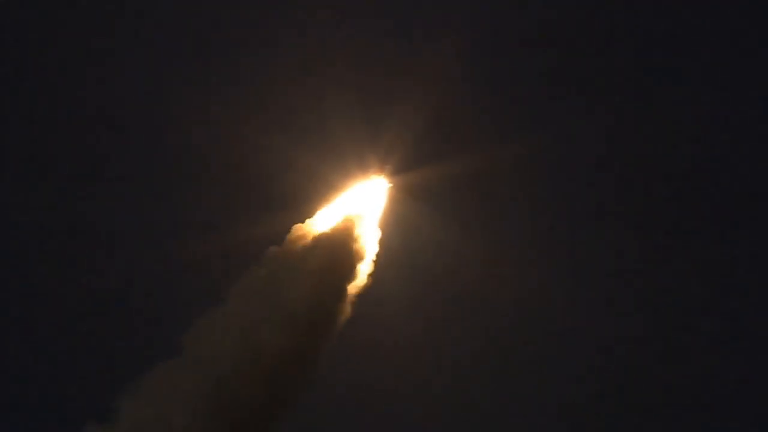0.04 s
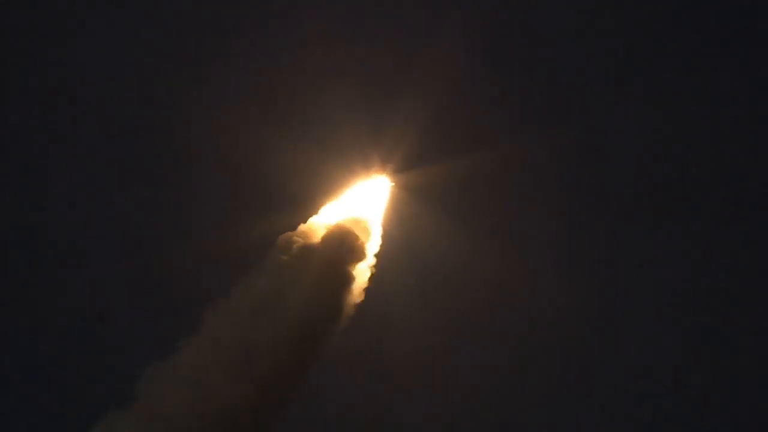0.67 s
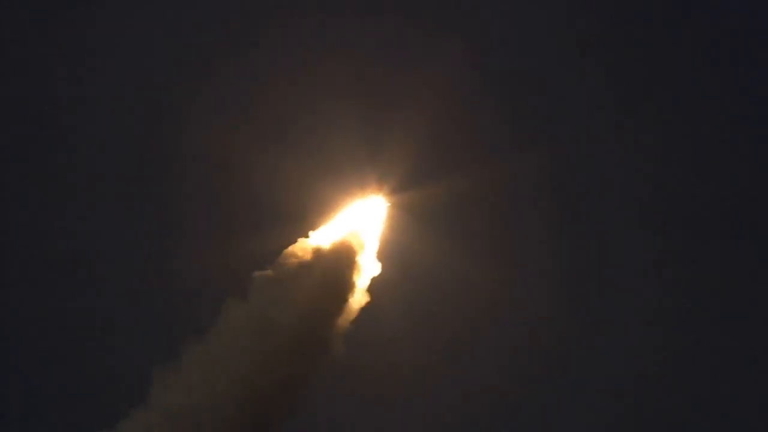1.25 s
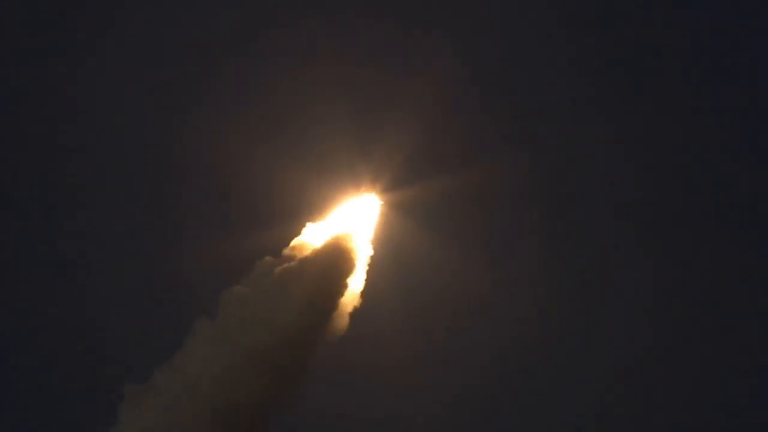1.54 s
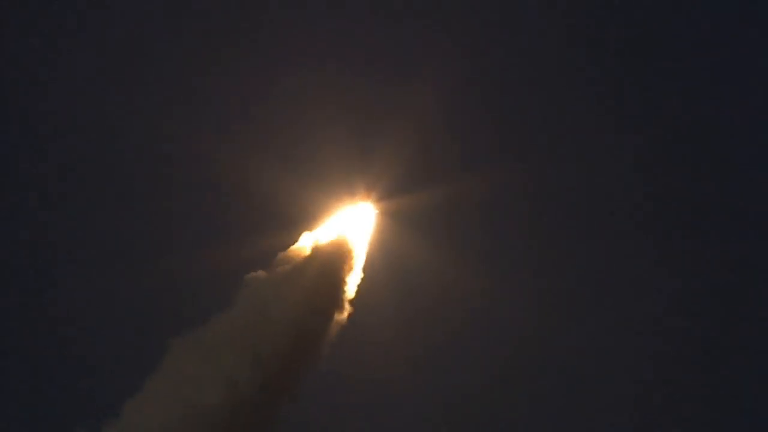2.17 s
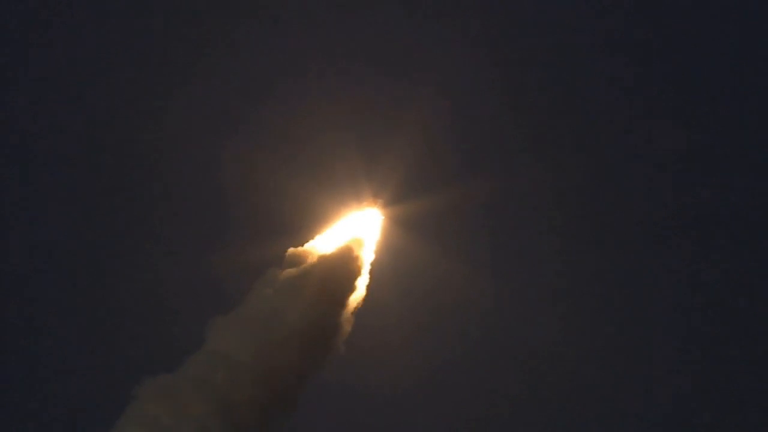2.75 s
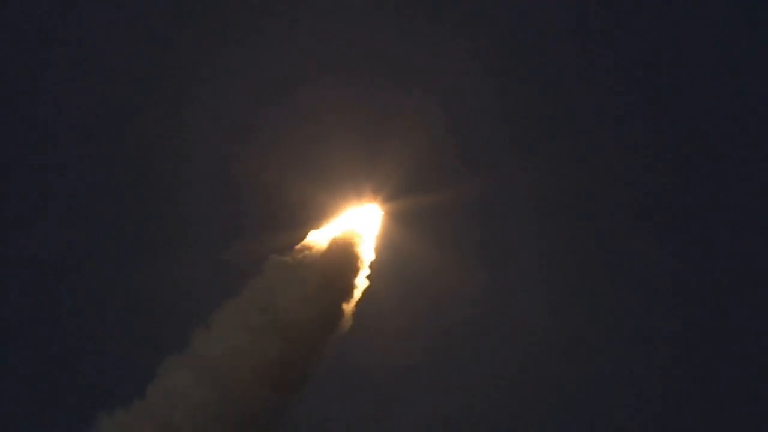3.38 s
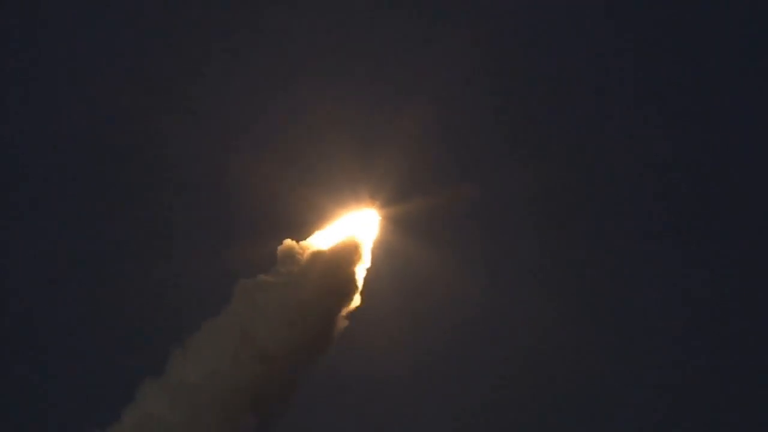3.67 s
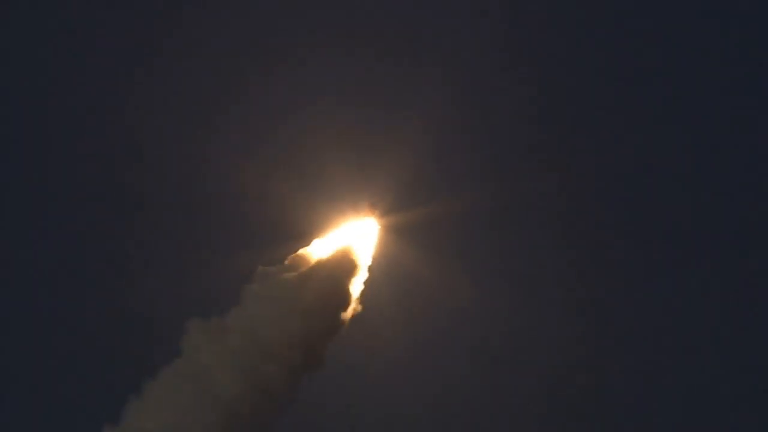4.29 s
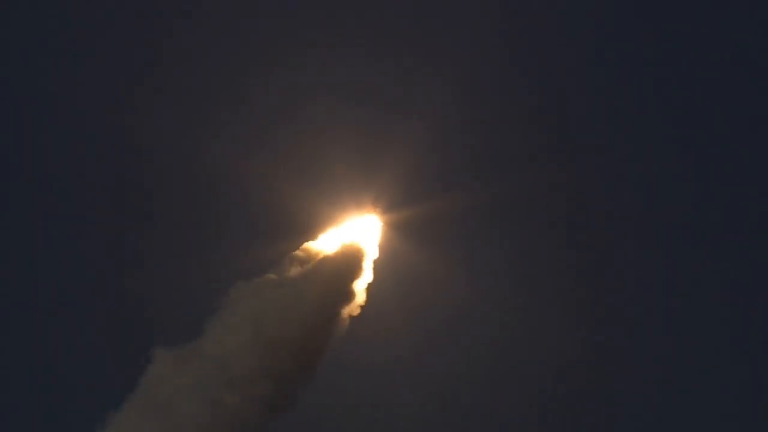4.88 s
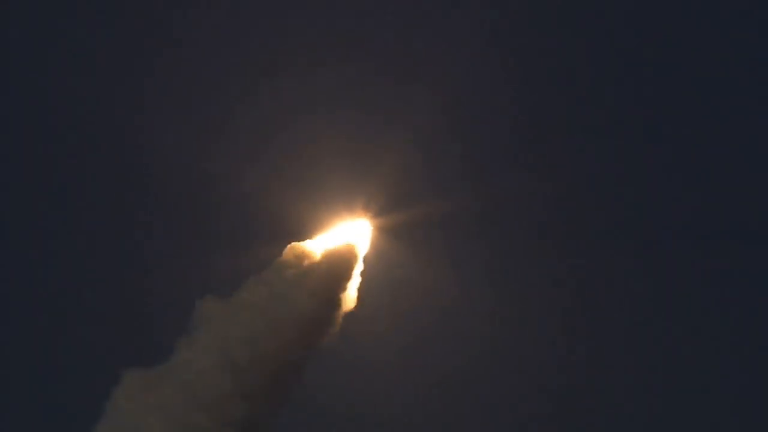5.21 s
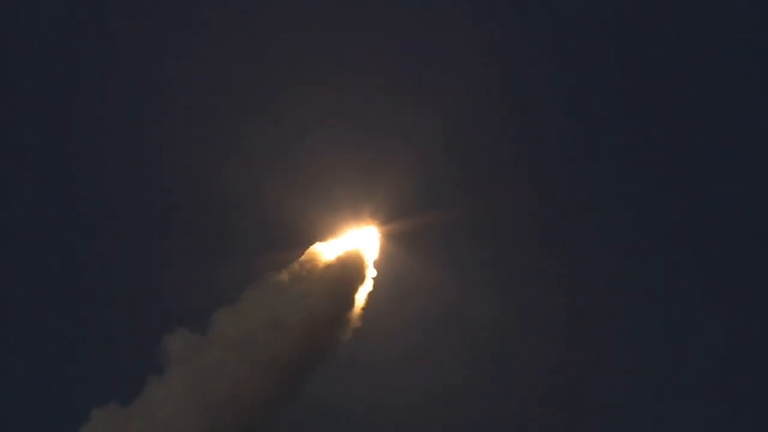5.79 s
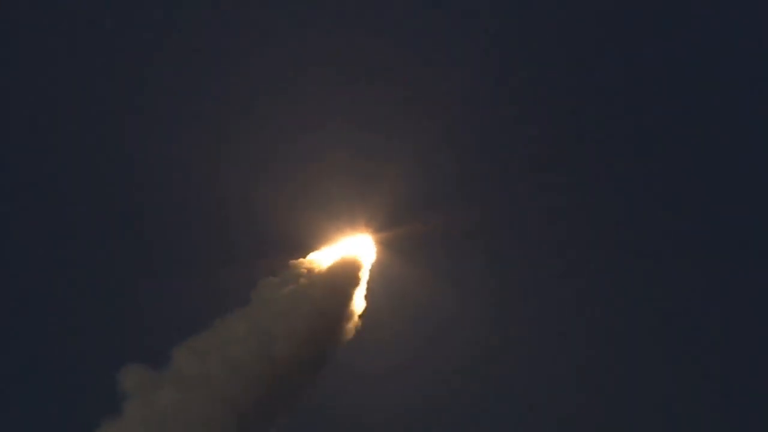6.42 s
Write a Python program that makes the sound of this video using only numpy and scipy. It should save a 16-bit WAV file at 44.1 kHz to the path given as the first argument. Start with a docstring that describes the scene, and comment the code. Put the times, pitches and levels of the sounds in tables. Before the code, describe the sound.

A rocket climbs far away in the open night sky, its engine making a continuous low roar with sharp, irregular crackles on top. The crackling is dense for the first two seconds, thins out briefly, then returns as duller pops and sputter while the roar gradually swells. A faint steady hiss lies underneath. It is all heard through one small microphone that picks up little deep bass.

```python
"""Sharp crackles over a low roar: a rocket climbs far away at night, heard through one small microphone.
Each crackle is a shock front from the exhaust, a pressure jump that relaxes again. The roar is
turbulent noise mixed with countless weak shocks that have merged. Air absorbs high frequencies most,
so with distance the crackles thin out and dull, while the roar swells over a faint steady hiss."""
import sys
import numpy as np
from scipy import signal
from scipy.fft import rfft, irfft, next_fast_len
from scipy.io import wavfile

SR = 44100
rng = np.random.default_rng(int(sys.argv[2]) if len(sys.argv) > 2 else 0)


def store_pcm(level_fs):
    """Save levels as 16-bit WAV."""
    pcm = np.round(np.clip(level_fs, -1, 1) * 32767).astype(np.int16)
    wavfile.write(sys.argv[1], SR, np.atleast_2d(pcm).T)


N = 293265
FFT_SIZE = next_fast_len(N + 8192)
HZ = np.fft.rfftfreq(FFT_SIZE, 1 / SR)


def gain_of(db):
    """Amplitude ratio: a factor of ten for every 20 dB."""
    return 10 ** (np.asarray(db) / 20)


def unit_rms(x):
    """Normalisation to a mean power of one."""
    return x / np.sqrt(np.mean(x ** 2) + 1e-20)


def follow(table):
    """Linear interpolation of each column over time, sample by sample."""
    time_s, *columns = np.transpose(table)
    return [np.interp(np.arange(N) / SR, time_s, column) for column in columns]


def spectrum(points):
    """Magnitude response: decibels interpolated over log frequency."""
    hz, db = np.transpose(points)
    return gain_of(np.interp(np.log(HZ + 1), np.log(hz + 1), db))


def low_pass(cutoff_hz, order, hz=HZ):
    """Low-pass magnitude: one half at the cutoff, a power law above it."""
    return 1 / (1 + (hz / cutoff_hz) ** order)


def minimum_phase(gain):
    """Causality: the Hilbert transform gives the phase of a filter that rings only after a click."""
    log_gain = np.log(np.maximum(gain, 1e-5))
    mirrored = np.r_[log_gain, log_gain[1:FFT_SIZE - len(HZ) + 1][::-1]]
    return np.exp(np.conj(signal.hilbert(mirrored)))[:len(HZ)]


def filtered(x, response):
    """Convolution in time is multiplication in frequency."""
    return irfft(rfft(x, FFT_SIZE) * response, FFT_SIZE)[:N]


def hiss(level_db=-79, edge_hz=7600, top_db=-18.0):
    """Filtered white noise: a faint steady hiss, much fainter above 7.6 kHz."""
    # noise spectrum: frequency_hz, gain_db
    noise_floor = [(100, 2.5), (3400, 0), (4600, 1.5), (7000, -0.5)]
    band = low_pass(edge_hz, order=200)
    colour = spectrum(noise_floor) * (band + gain_of(top_db) * (1 - band))
    return gain_of(level_db) * unit_rms(filtered(rng.standard_normal(N), colour))


def reflections():
    """Comb filtering: two weak inverted echoes from close by ripple the spectrum."""
    # nearby reflections: delay_ms, level_db
    echoes = [(4.45, -19.5), (6.4, -25)]
    return 1 - sum(gain_of(db) * np.exp(-2j * np.pi * HZ * ms / 1000) for ms, db in echoes)


def flutter(depth_db=0.74, slowest_hz=3.2, fastest_hz=22):
    """Scintillation: turbulent air along the path makes the level ragged."""
    band = low_pass(fastest_hz, order=4) - low_pass(slowest_hz, order=4)
    return gain_of(depth_db * unit_rms(filtered(rng.standard_normal(N), band)))


def wandering_dip(x, width_hz=130):
    """Cancellation: subtracting part of a narrow moving band hollows the sound."""
    # path of the dip: time_s, centre_hz, depth_fraction
    dip_path = [(0, 257, 0.1), (1.1, 547, 0.7), (2.4, 606, 0), (3.3, 514, 0.2), (5.0, 450, 0.2),
                (5.6, 295, .45), (6.65, 303, .45)]
    centre_hz, depth = follow(dip_path)
    carrier = np.exp(2j * np.pi * np.cumsum(centre_hz) / SR)
    pole = np.exp(-np.pi * width_hz / SR)
    baseband = signal.lfilter([1 - pole], [1, -pole], x / carrier)
    return x - depth * 2 * (carrier * baseband).real


def merged_shocks(per_s=420, spread_db=4, max_spreads=4.4):
    """Shot noise: countless weak shocks of uneven size arrive at random moments."""
    sizes = gain_of(spread_db * np.minimum(rng.exponential(1, N), max_spreads))
    clicks = sizes * (rng.random(N) < per_s / SR)
    return unit_rms(clicks.mean() - clicks)


def roar(rumble_trim_db=1.0, body_trim_db=-0.4, rasp_trim_db=-0.36, rasp_grain=0.23):
    """Jet noise: turbulence and merged shocks add in power, and swell with the exhaust."""
    # exhaust levels before the trims: time_s, rumble_db, body_db, rasp_db
    exhaust_levels = [(0.0, -53, -49.5, -72.5), (0.55, -53, -46.5, -70), (0.95, -48.5, -43.5, -68),
                      (1.3, -51, -41.5, -67.5), (1.8, -55, -41.5, -68.5), (2.2, -53, -46.5, -67.5),
                      (2.85, -53.5, -45, -67.5), (3.05, -51, -45.5, -67.5), (3.27, -57.5, -46, -67.5),
                      (3.5, -47.5, -42, -68), (3.85, -50.5, -40, -65), (4.2, -48.5, -43.5, -64),
                      (4.7, -48.5, -43, -65), (5.35, -47, -42.5, -67), (5.6, -47, -39.5, -65),
                      (5.9, -42.5, -36.5, -65.5), (6.15, -49.0, -40.5, -64.5), (6.65, -49.5, -37.5, -65)]
    # spectrum of the turbulence: frequency_hz, gain_db
    turbulence = [(20, -30), (42, -27.5), (65, -18), (100, -6.5), (150, -1), (220, 3.5), (280, 0),
                  (350, 1.85), (560, -3.5), (680, -6.5), (790, -10), (1050, -16.5), (1500, -26),
                  (2000, -33), (2700, -42), (4500, -69.5)]
    # weak shocks melt into noise with distance: time_s, shock_fraction, upper_lift_db, fizz_lift_db
    texture = [(0, 0.5, 6.5, -3), (1, 0.6, -3.5, -3.5), (2, 0.4, 0.5, -3), (3.3, 0.45, -4, -2.5),
               (4.4, 0.34, -2.5, 0), (6.65, 0.45, -5.5, 2)]
    rumble_db, body_db, rasp_db = follow(exhaust_levels)
    grain, upper_lift_db, fizz_lift_db = follow(texture)
    eddies = rng.standard_normal(N)
    # one share a band; weak shocks have blunt fronts, so the top band is the smoothest
    shares = np.clip([grain, grain, grain, grain * rasp_grain], 0, 1)
    jets = np.sqrt(1 - shares) * eddies + np.sqrt(shares) * merged_shocks()
    colour = minimum_phase(spectrum(turbulence)) * reflections()
    edges = [0] + [low_pass(hz, order=12) for hz in (200, 560, 1200)] + [1]
    bands = [high - low for low, high in zip(edges, edges[1:])]
    rumble, lower, upper, top = (filtered(jet, colour * band) for jet, band in zip(jets, bands))
    body = wandering_dip(lower + gain_of(upper_lift_db) * upper) * flutter()
    fizz = filtered(top, 1 - low_pass(2200, order=12))
    rasp = top + (gain_of(fizz_lift_db) - 1) * fizz
    return (gain_of(rumble_db + rumble_trim_db) * unit_rms(rumble)
            + gain_of(body_db + body_trim_db) * unit_rms(body)
            + gain_of(rasp_db + rasp_trim_db) * unit_rms(rasp))


def rounded_front(hz, rise_ms):
    """Air absorption: a loss in dB that grows with frequency squared rounds a front."""
    return np.exp(-np.pi * (hz * rise_ms / 1000) ** 2)


def twin_front(hz, gap_ms, level_db):
    """Interference: a second front a moment later cuts notches in the treble."""
    treble = 1 - low_pass(700, order=4, hz=hz)
    return 1 + gain_of(level_db) * treble * np.exp(-2j * np.pi * hz * gap_ms / 1000)


def scatter(hz, level_db=-16.5, decay_s=0.015, delay_s=0.0028):
    """Scattering: a short diffuse tail, new for every shock, follows the direct sound."""
    t = np.arange(2 * (len(hz) - 1)) / SR
    tail = rng.standard_normal(len(t)) * np.exp(-t / decay_s) * (t > delay_s)
    treble = 1 - low_pass(450, order=4, hz=hz)
    return 1 + gain_of(level_db) * rfft(tail / np.linalg.norm(tail)) * treble


def arrival(low_cut_hz=315, damping=1.09, coupling_hz=50, dull_hz=1000, fade_hz=5000):
    """Band-pass response: distance dulls a jump; the microphone's low cut makes it a triple swing."""
    jf = 1j * HZ
    low_cut = jf ** 2 / (jf ** 2 + damping * low_cut_hz * jf + low_cut_hz ** 2)
    coupling = jf / (jf + coupling_hz)
    distance = low_pass(fade_hz, order=8) / (1 + jf / dull_hz)
    return low_cut * coupling * distance


def shocks(rows, tip_rise_ms=0.18):
    """Shock waves: each pressure jump relaxes exponentially; a part stays steep as its bright tip."""
    # colour of all shocks, a midrange knock and a bite above it: frequency_hz, gain_db
    bite = [(180, 1), (280, -0.5), (400, -1), (790, -0.13), (1100, -1.4), (1500, -0.05), (2050, 1.5),
            (2650, 1.6), (3300, 3)]
    size, lead = 2048, 200  # samples
    hz = np.fft.rfftfreq(size, 1 / SR)
    jw = 2j * np.pi * hz
    fronts = np.zeros(N + 2 * size)
    for start_s, jump_db, rise_ms, relax_ms, tip_db, gap_ms, twin_db in rows:
        first = max(int(start_s * SR) - lead, 0)
        jump = gain_of(jump_db) * SR / (jw + 1000 / relax_ms)
        edge = rounded_front(hz, rise_ms) + gain_of(tip_db) * rounded_front(hz, tip_rise_ms)
        shock = jump * edge * twin_front(hz, gap_ms, twin_db) * scatter(hz)
        delay = np.exp(-jw * (start_s - first / SR))
        fronts[first:first + size] -= irfft(shock * delay)
    return filtered(fronts, arrival() * minimum_phase(spectrum(bite)) * reflections())


def sputter(trim_db=-1.0, per_s=22, spread_db=2, blunting_ms_per_s=0.085):
    """Weaker shocks come in surges; absorption blunts them more as the rocket recedes."""
    # typical strength of the shocks: time_s, jump_db
    surges = [(0, -28), (.45, -24.5), (.8, -22), (1.3, -22.5), (1.8, -20.5), (2.2, -22.5), (3.3, -24),
              (3.75, -16.5), (4.9, -14), (5.9, -13), (6.65, -13.5)]
    # twin fronts merge into the leading front with distance: time_s, twin_db
    twin_fade = [(0, -10), (2, -11), (6.65, -21.5)]
    count = int(per_s * N / SR)
    place, strength, bluntness, lag = rng.uniform(-1, 1, (count, 4)).T
    start_s = (np.arange(count) + (1 + place) / 2) / per_s  # one shock at random in each time slot
    jump_db = np.interp(start_s, *np.transpose(surges)) + spread_db * strength
    rise_ms = (0.51 + blunting_ms_per_s * start_s) * np.exp(0.13 * bluntness)
    relax_ms = 0.16 * 2 ** (-jump_db / 6)  # a jump 6 dB stronger relaxes in half the time
    tip_db = np.full(count, -41)
    gap_ms = np.interp(lag, [-1, 1], [0.33, 1.3])
    twin_db = np.interp(start_s, *np.transpose(twin_fade))
    return gain_of(trim_db) * shocks(zip(start_s, jump_db, rise_ms, relax_ms, tip_db, gap_ms, twin_db))


def crackle(trim_db=0.04):
    """Jet crackle: the strong shock fronts stand out of the roar as separate cracks."""
    # one shock a row, tip and twin relative to its jump:
    # start_s, jump_db, rise_ms, relax_ms, tip_db, twin_gap_ms, twin_db
    cracks = [(0.0154, -24, 0.22, 0.69, -46, 0.87, -3), (0.0505, -13, 0.54, 0.1, -31, 1.1, 0),
              (0.0705, -14.5, 0.37, 0.26, -15.0, 0.33, -4), (0.0757, -17, 0.48, 0.4, -29.0, 0.41, -2.0),
              (0.0831, -15.0, 0.61, 0.2, -29.0, 1.4, -7.0), (0.1058, -13.5, 0.45, 0.22, -19, 0.36, -5),
              (0.1474, -14.0, 0.36, 0.34, -14.5, 0.26, -5.0), (0.1739, -18.5, 0.33, 0.42, -23, 0.29, -4.0),
              (0.2424, -12, 0.5, 0.14, -17, 0.35, -12), (0.2712, -10.5, 0.36, 0.1, -50.0, 0.28, -5),
              (0.2816, -10.5, 0.77, 0.12, -5, 0.76, -17.0), (0.2955, -18, 0.5, 0.26, -25.0, 0.63, -2),
              (0.3015, -12, 0.33, 0.1, -50.0, 0.78, -7.0), (0.3314, -13, 0.46, 0.17, -17, 0.43, -10),
              (0.3527, -12.5, 0.53, 0.15, -47.0, 0.47, -2.0), (0.3926, -3.5, 0.4, 0.1, -50.0, 0.95, -13.0),
              (0.4004, -15, 0.46, 0.62, -50.0, 1.12, -8), (0.4213, -18, 0.44, 0.2, -34, 0.3, -3.0),
              (0.4354, -4.5, 0.47, 0.13, -27, 0.5, -16), (0.4424, -14.5, 0.46, 0.12, -26.0, 1.32, -12),
              (0.4699, -10.5, 0.57, 0.33, -24, 1.04, -8), (0.4897, -20.0, 0.49, 0.73, -30.0, 1.17, -6),
              (0.5555, -13, 0.67, 0.19, -33.0, 0.95, -6), (0.6062, -6, 0.46, 0.088, -42.0, 0.42, -4),
              (0.6193, -6.5, 0.42, 0.11, -45, 0.4, -4), (0.651, -23, 0.49, 1.6, -9.5, 1.1, -2),
              (0.6744, -15.5, 0.52, 0.21, -53, 0.45, -2.0), (0.7687, -18.5, 0.46, 1.26, -6, 0.84, -5),
              (0.7785, -14.5, 0.51, 0.42, -11.5, 1.6, -0.5), (0.8159, -23.5, 0.39, 0.38, -52, 0.78, 0),
              (0.8934, -16.0, 0.39, 0.12, -40, 0.44, -5), (0.8987, -21, 0.45, 1.65, -12, 1.8, 0),
              (0.9204, -19, 0.4, 1.5, -17.0, 0.44, -11.0), (0.9257, -15.5, 0.52, 0.29, -21, 0.49, -10),
              (0.9343, -25.5, 0.34, 1.65, -14.0, 0.71, -5), (1.0126, -13, 0.73, 0.28, -30, 0.67, -10.0),
              (1.0383, -23, 0.31, 1.09, -47.0, 0.36, -6), (1.0538, -21, 0.38, 0.41, -50.0, 0.29, 0),
              (1.0909, -17.5, 0.64, 1.5, -21, 1, -2), (1.1316, -18, 0.45, 1.8, -12, 1.2, -3),
              (1.1504, -17.5, 0.63, 0.38, -18, 0.83, -12), (1.1629, -21, 0.57, 0.82, -28, 0.93, 6),
              (1.2119, -16.5, 0.39, 0.1, -40.0, 0.25, 3), (1.2522, -12.5, 0.45, 0.45, -12.5, 0.75, -4),
              (1.2621, -14.0, 0.64, 1.1, -35, 0.99, 6), (1.2925, -22, 0.35, 0.28, -52, 1.3, -10),
              (1.3404, -16, 0.43, 1.65, -15.0, 0.76, -8), (1.3599, -16.0, 0.48, 1.1, -24.0, 1.11, -1),
              (1.3693, -14, 0.51, 0.19, -20.0, 1.8, -7), (1.3959, -16, 0.47, 1.65, -16.0, 1, -7),
              (1.4046, -15.0, 0.31, 1.4, -8, 0.96, -5), (1.4307, -13, 0.79, 1.8, -27, 0.83, -1),
              (1.4481, -21, 0.4, 0.58, -50.0, 0.85, -2.0), (1.4931, -15.5, 0.57, 0.51, -50.0, 0.8, 1),
              (1.5519, -5, 0.62, 0.21, -29, 0.83, 1.5), (1.5586, -14, 0.3, 0.75, -41, 0.34, -7),
              (1.6086, -2.5, 0.47, 0.1, -33, 0.75, -11), (1.645, -9.5, 0.43, 0.97, -36, 0.37, -7.5),
              (1.6731, -6.5, 0.35, 0.38, -47.0, 0.55, -14), (1.7216, -9.5, 0.5, 0.56, -23, 0.49, -10),
              (1.7309, -8, 0.34, 0.16, -50.0, 0.91, 2), (1.7564, -14.5, 0.36, 0.34, -27.0, 1.11, -17.0),
              (1.764, -13, 0.48, 1.04, -26.0, 0.74, -9), (1.7908, -13.5, 0.37, 0.51, -49, 0.46, -20.0),
              (1.7969, -7.5, 0.39, 0.29, -50.0, 1.13, -14), (1.8084, -2, 0.35, 0.12, -50.0, 1.03, -17),
              (1.8169, -9.5, 0.35, 0.42, -49, 0.47, -14), (1.8271, -11, 0.43, 0.15, -50.0, 1.32, -16.0),
              (1.8411, -8.5, 0.5, 0.28, -50.0, 1.64, -13.0), (1.8522, -2.0, 0.45, 0.1, -40.0, 0.91, -15),
              (1.8647, -13, 0.4, 0.63, -31.0, 0.93, -15.0), (1.8705, -12, 0.54, 0.16, -39.0, 0.57, -6),
              (1.9235, -11.5, 0.44, 0.36, -49, 1.6, -10), (1.9437, -12.0, 0.48, 0.27, -29.0, 0.54, -11.0),
              (1.9758, -12.5, 0.47, 0.4, -29, 1.45, -14), (2.0077, 3.0, 0.51, 0.1, -25, 0.51, -10.0),
              (2.0419, -10.5, 0.47, 0.43, -27, 0.71, -10), (2.0598, -15.0, 0.71, 0.48, -26, 0.76, 0),
              (2.1009, -6, 0.65, 0.12, -34, 0.69, -7.0), (2.2442, -14.5, 0.63, 0.19, -29.0, 1.1, -11),
              (2.275, -18.5, 0.52, 0.72, -25, 0.77, -6), (2.342, -21.5, 0.36, 1.06, -45, 1.4, -7),
              (2.4483, -12, 0.29, 0.36, -50, 0.24, -9), (2.5789, -19, 0.42, 0.94, -48, 1.6, -8),
              (2.6051, -17.0, 0.35, 0.88, -22, 1.4, -11), (2.6121, -18, 0.4, 0.91, -27, 1.6, -6),
              (2.8427, -15, 0.49, 0.89, -17, 0.45, -5), (2.8524, -21, 0.57, 1.16, -26, 0.8, 1),
              (2.8853, -18.5, 0.37, 0.63, -4.5, 0.63, -16), (3.0271, -21.5, 0.57, 1.9, -42, 0.52, 0),
              (3.0357, -8.0, 0.63, 0.24, -37.0, 0.72, 1), (3.0479, -19, 0.47, 1.65, -20, 1.0, -6),
              (3.0593, -26.5, 0.33, 1.9, -18.0, 1.1, -7), (3.1372, -20, 0.6, 1.4, -22.0, 1.12, -6.0),
              (3.1604, -15.5, 0.78, 0.32, -34, 0.89, 1), (3.4385, -15.5, 0.8, 1.1, -23, 0.63, 2),
              (3.6306, -12.5, 0.69, 0.76, -19, 0.66, -12), (3.6671, -8.5, 0.51, 0.8, -18.5, 0.38, -8.0),
              (3.8817, -14, 0.61, 1.6, -36, 1.1, -3.0), (3.9188, -11.5, 0.31, 1.2, -11.5, 1.48, -16),
              (3.9658, -16.5, 0.49, 0.29, -25, 0.6, -6), (4.2174, -11.5, 0.77, 1.1, -31.0, 1.2, 0),
              (4.2311, -11, 0.53, 0.66, -31.0, 0.39, -2.0), (4.27, -13, 0.94, 1.5, -30, 1.16, 0),
              (4.4461, -14, 0.57, 1, -16, 1.44, -7), (4.4559, -22, 0.6, 1.6, -14, 1.3, 1),
              (4.4643, -10, 0.76, 0.69, -15.0, 1.24, -3), (4.4737, -18, 0.69, 1.7, -23.0, 1.5, -2.0),
              (4.6733, -11.5, 1.14, 0.77, -27.0, 1.7, -2.0), (4.8873, -11, 1.26, 0.71, -25, 1.12, -8),
              (5.0201, -10.5, 0.89, 1.65, -32, 1.27, -12.0), (5.0735, -5.5, 1.0, 0.19, -39, 1.3, -3),
              (5.121, -5, 0.98, 0.2, -42, 1.36, -2.0), (5.2056, -4.5, 0.7, 0.1, -39.0, 1.3, 1.5),
              (5.2218, -19.5, 0.53, 0.98, -27.0, 0.34, 1), (5.3208, -14.5, 0.76, 0.85, -31.0, 1.29, -1),
              (5.3714, -13, 0.55, 0.16, -50.0, 1.26, -6), (5.4162, -1.5, 0.51, 0.1, -50.0, 0.23, -6),
              (5.4352, -20, 0.58, 0.26, -31.0, 0.37, -1.5), (5.448, -10.5, 0.7, 0.62, -31, 1.01, -11.0),
              (5.496, 5.5, 0.47, 0.098, -35.0, 0.71, -16), (5.6375, -24, 0.35, 0.93, -50.0, 1.8, 0),
              (5.7053, 0, 1.08, 0.15, -37.0, 0.51, -2), (5.789, -8.5, 0.81, 0.31, -33, 0.76, -4.0),
              (5.7973, -14.5, 0.82, 0.73, -36, 0.47, 3), (5.8357, -9.5, 0.69, 0.5, -29, 1.5, -8.0),
              (5.8867, -13, 0.65, 0.31, -38.0, 0.48, -5), (5.89, -6.5, 0.73, 0.36, -35, 0.37, -4),
              (5.9354, -4, 0.57, 0.31, -50.0, 0.43, -1), (5.9759, -5.5, 1.06, 0.37, -32, 1.12, -17),
              (6.0074, -8.5, 0.85, 0.54, -36, 0.32, -2.0), (6.0296, -6.0, 0.4, 0.66, -52, 0.32, -5.5),
              (6.1568, -9, 0.84, 0.5, -28.0, 1.1, -12), (6.1824, -6.5, 0.9, 0.34, -29.0, 1, -8),
              (6.2347, -11.5, 0.71, 0.55, -40.0, 0.48, -4), (6.2446, -13, 0.72, 0.67, -28, 0.34, -2),
              (6.3602, -10, 0.96, 1.4, -31, 1.2, -7.0), (6.4534, -6.5, 0.56, 0.88, -50.0, 0.5, -4.0),
              (6.4928, -9.5, 0.97, 0.48, -27, 0.97, -12), (6.5515, -6, 0.63, 0.17, -50.0, 0.36, -6),
              (6.5757, -9, 0.65, 0.27, -37.0, 0.38, -1)]
    return gain_of(trim_db) * shocks(cracks)


def scene():
    """Superposition: cracks, sputter, roar and hiss add in one channel."""
    return (crackle() + sputter() + roar() + hiss())[None]


def record(dry, cutoff_hz=12400):
    """Band limiting: a steep linear-phase low-pass removes the highest treble."""
    kernel = signal.firwin(511, cutoff_hz, window=("kaiser", 9), fs=SR)
    return signal.oaconvolve(dry, kernel[None], "same")


dry = scene()
out = record(dry)
store_pcm(out)
```